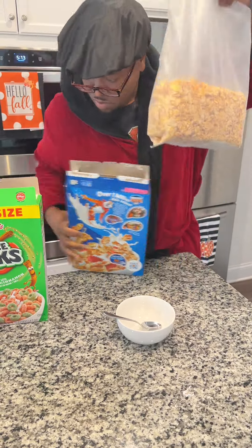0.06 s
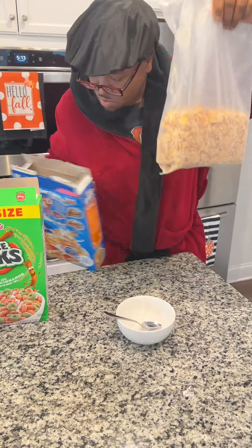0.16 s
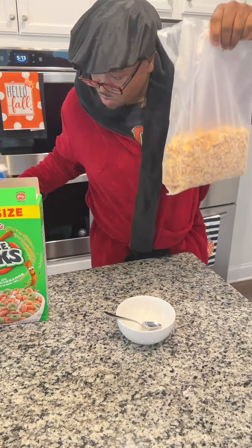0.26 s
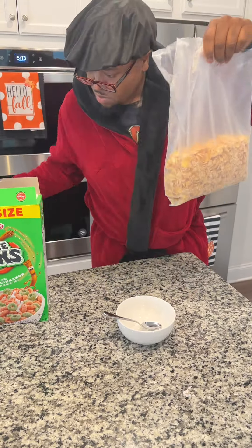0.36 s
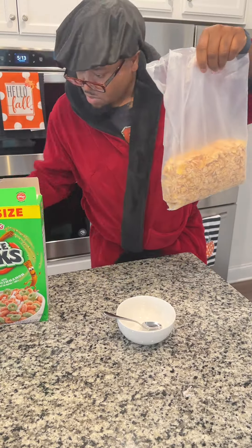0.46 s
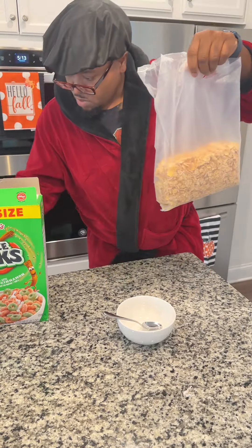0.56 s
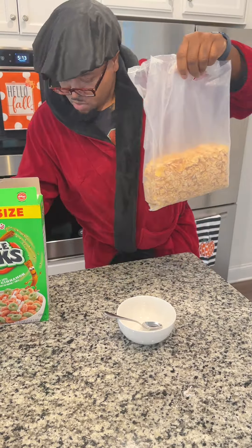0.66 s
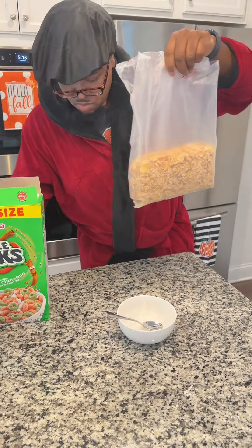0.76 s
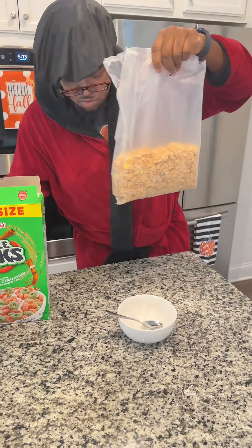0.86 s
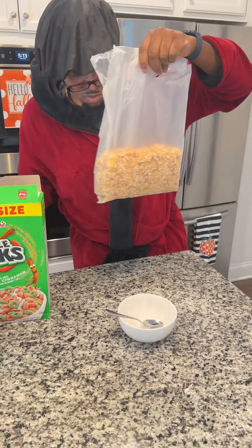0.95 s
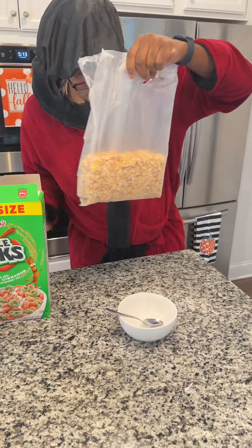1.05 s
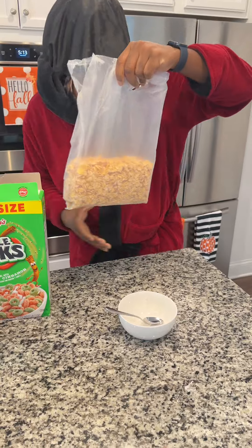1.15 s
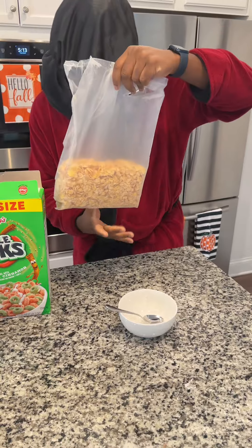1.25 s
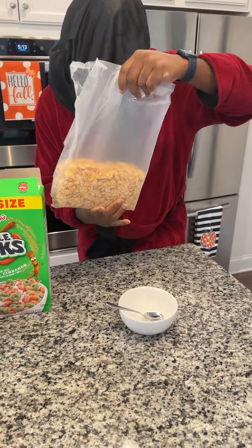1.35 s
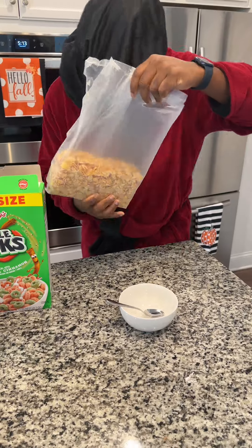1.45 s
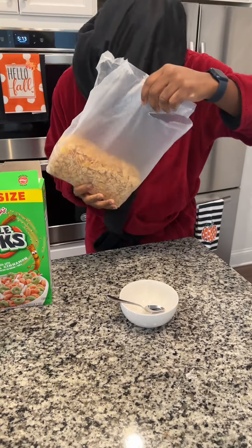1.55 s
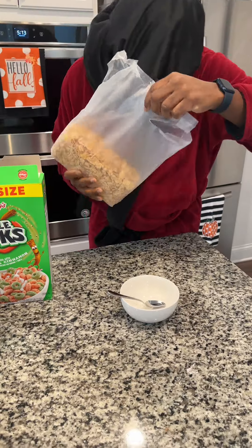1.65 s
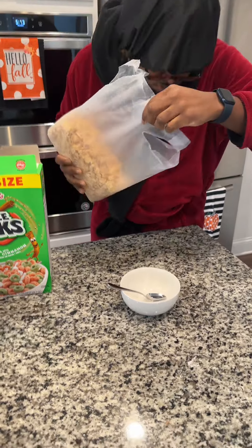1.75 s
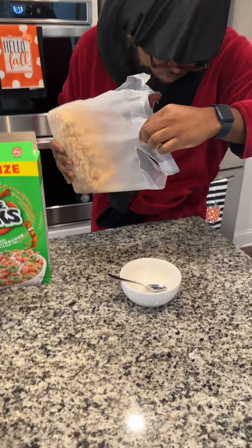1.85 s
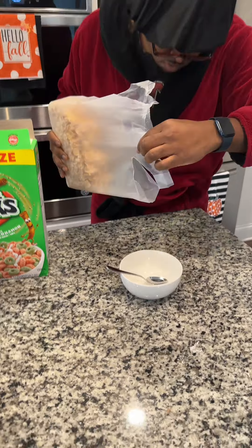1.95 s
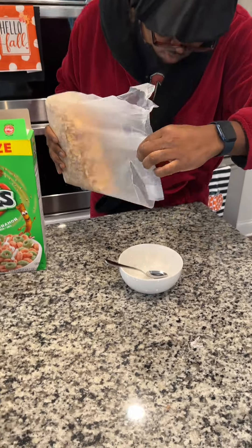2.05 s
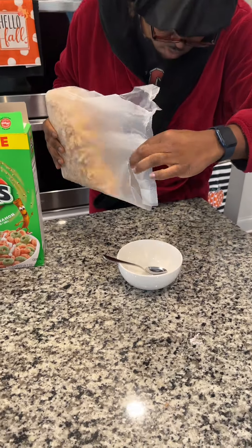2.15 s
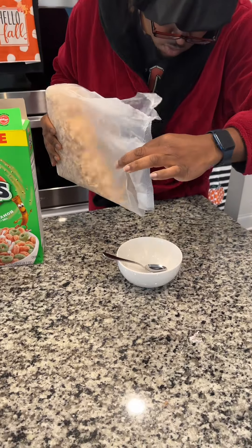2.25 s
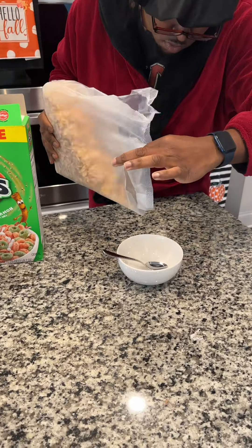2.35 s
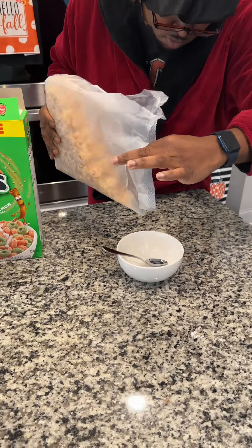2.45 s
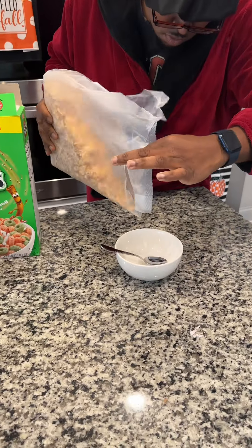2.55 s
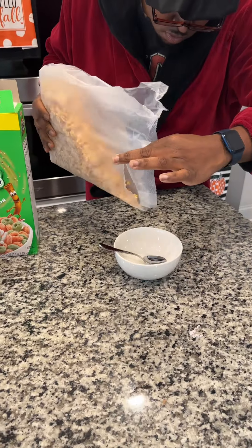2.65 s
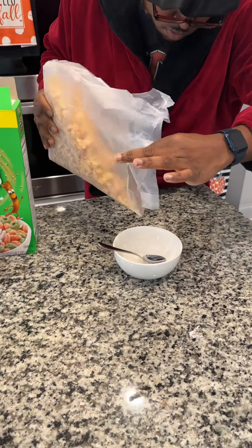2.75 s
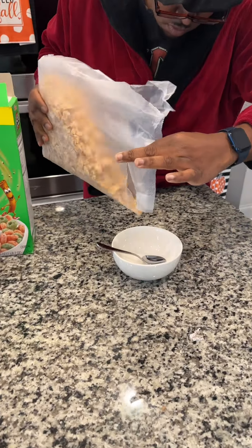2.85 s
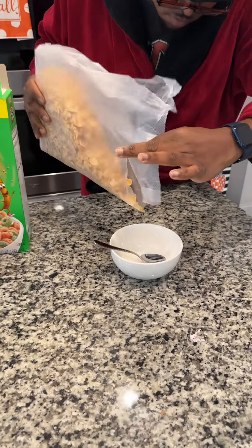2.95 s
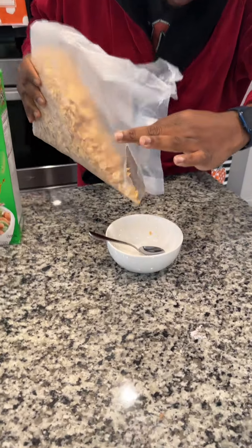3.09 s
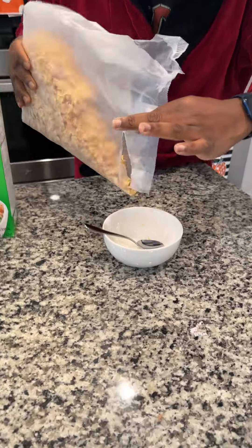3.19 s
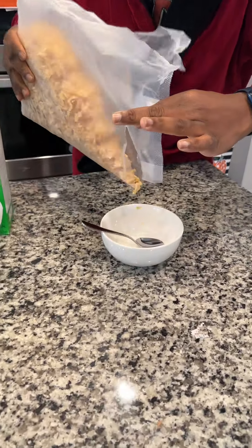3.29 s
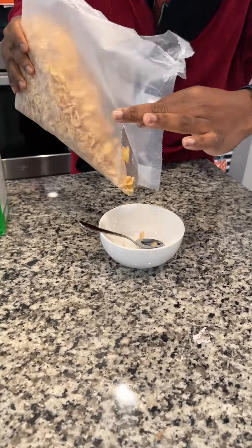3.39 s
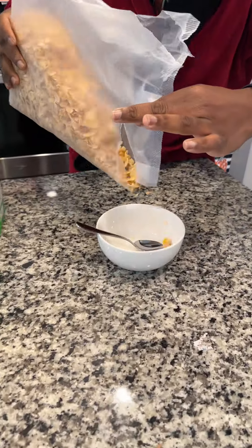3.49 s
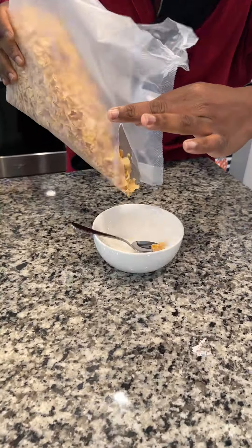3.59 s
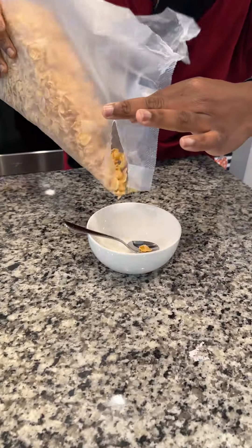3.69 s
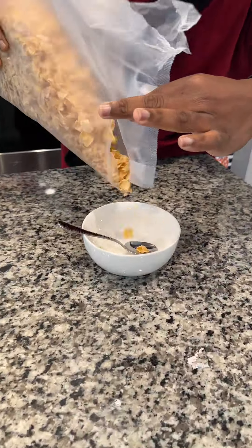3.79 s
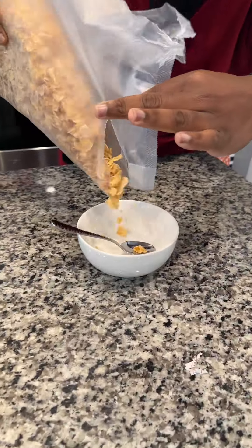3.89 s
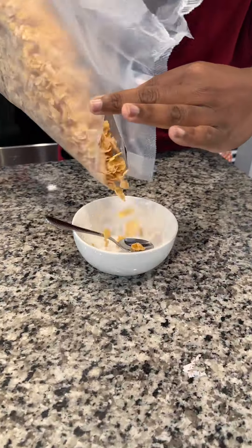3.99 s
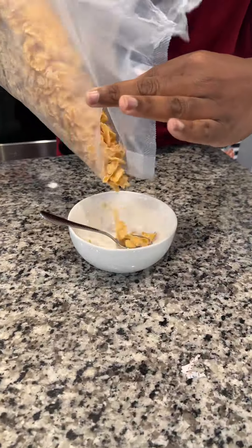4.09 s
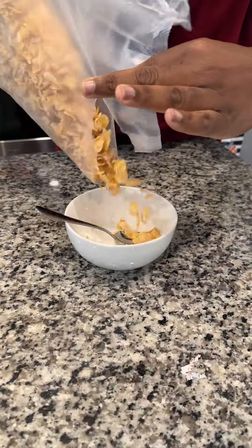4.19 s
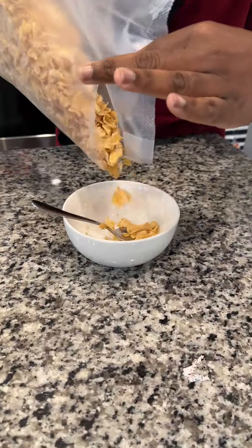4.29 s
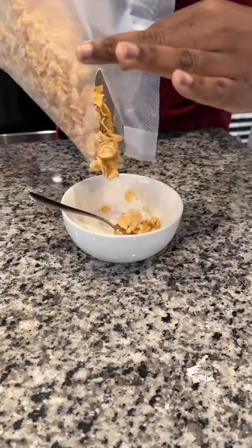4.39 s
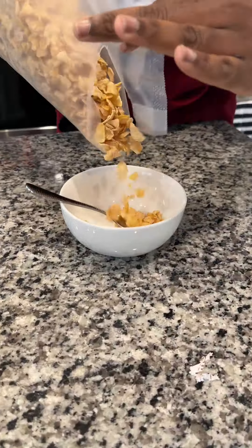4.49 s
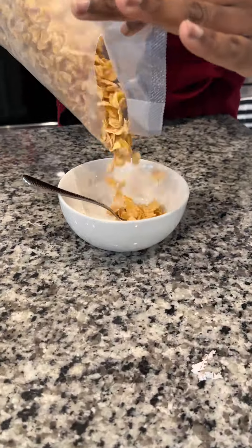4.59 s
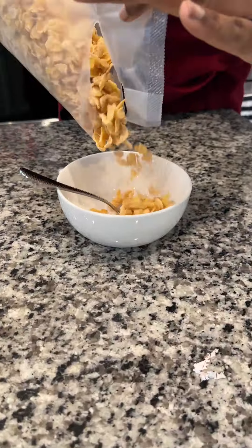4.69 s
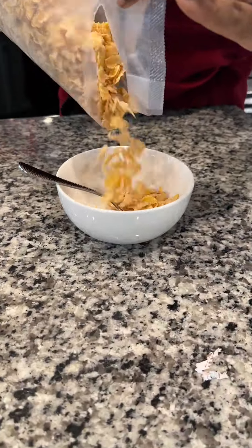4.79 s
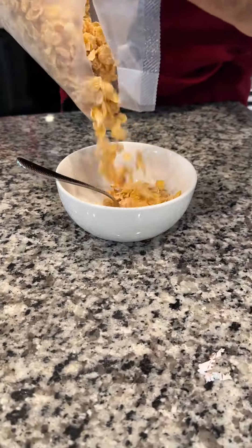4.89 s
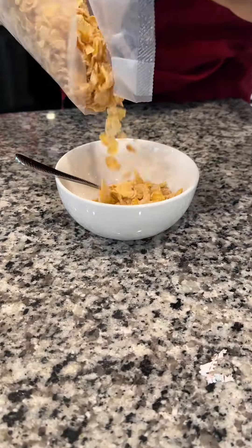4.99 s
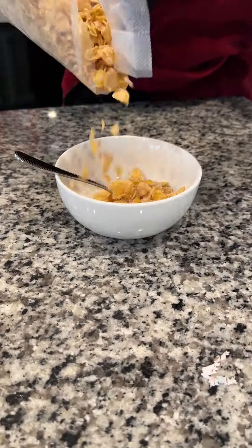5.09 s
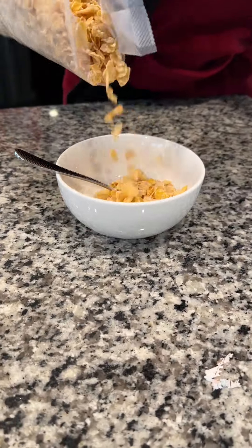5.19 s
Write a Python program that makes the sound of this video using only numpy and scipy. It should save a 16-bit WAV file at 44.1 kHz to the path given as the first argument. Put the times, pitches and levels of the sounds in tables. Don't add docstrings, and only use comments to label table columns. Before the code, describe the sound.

Papery film crinkles, then a short breathy swish of moving cardboard ends in a sharp hollow knock with small bounces on the floor. A full bag lands in a hand with a muffled thump, and its contents slide with dry hiss. Single flakes crack into a bowl, then a steady crisp trickle makes ceramic and spoon ring faintly. Phone microphones nearby, light room reflections, quiet hum beneath.

```python
import sys
import numpy as np
from scipy import signal
from scipy.fft import rfft, irfft, next_fast_len
from scipy.io import wavfile
from scipy.ndimage import uniform_filter1d

SR = 44100
rng = np.random.default_rng(int(sys.argv[2]) if len(sys.argv) > 2 else 0)


def generate_wav(signal):
    frames = np.transpose(np.atleast_2d(signal))
    scaled = np.clip(frames, -1, 1) * 32767
    pcm = np.round(scaled).astype(np.int16)
    wavfile.write(sys.argv[1], SR, pcm)


def boost(x):
    u = np.asarray(x, float) / 20
    return 10 ** u


N = 230978
SIZE = next_fast_len(N + SR)
HZ = np.maximum(np.arange(SIZE // 2 + 1) * SR / SIZE, 1)


def rms_one(x):
    return x / np.sqrt(np.mean(x ** 2) + 1e-20)


def in_time(rows):
    s, *columns = np.transpose(rows)
    return [np.interp(np.arange(N) / SR, s, c) for c in columns]


def at_hz(points, hz):
    table_hz, value = np.array(points).T
    return np.interp(np.log(hz), np.log(table_hz), value)


def drift(rate_hz):
    r = np.exp(-80 * np.pi * rate_hz / SR)
    slow = signal.lfilter([1], [1, -2 * r, r * r], rng.standard_normal(N // 40 + 2002))[2000:]
    return np.interp(np.arange(N) / 40, np.arange(len(slow)), rms_one(slow))


def ring(clicks, hz, t60_s):
    r, w = boost(-60 / (t60_s * SR)), 2 * np.pi * hz / SR
    return signal.lfilter([0, np.sin(w)], [1, -2 * r * np.cos(w), r * r], clicks + 1e-18)


def coloured(spectrum):
    noise = rfft(rng.standard_normal(SIZE))
    return rms_one(irfft(noise * boost(at_hz(spectrum, HZ)), SIZE)[:N])


def swell(s, length_s, rise_s, fall_s):
    t = np.arange(N) / SR - s
    return np.clip(t / rise_s, 0, 1) * np.exp(-np.maximum(t - length_s, 0) / fall_s)


def thump(blows, modes, damping, slap_db):
    push = np.zeros(N)
    for s, db, cut_hz in blows:
        step = 2 * np.pi * cut_hz / SR
        span = np.arange(2000) * step
        push[round(s * SR):][:2000] += boost(db) * span * np.exp(-span) * step
    body = np.zeros(N)
    for sign, (hz, db, t60_s) in zip(rng.choice([-1, 1], len(modes)), modes):
        body += sign * boost(db) * ring(push, hz, t60_s * damping)
    return body + boost(slap_db) * np.gradient(push)


# start_s, hum_db, shift_db
RUMBLE = [(0.0, -55.5, -57), (0.9, -58, -56), (2.42, -55, -45.5), (3.17, -57, -46), (4.24, -50, -46.5),
          (5.24, -57.5, -51.5)]
# pitch_hz, level_db (per Hz)
HUM = [(25, -25), (45, 1), (62, 4.5), (85, -5.5), (125, 0.5), (170, -29), (300, -50)]


def refrigerator():
    hum_db, _ = in_time(RUMBLE)
    return boost(hum_db - 0.5) * coloured(HUM)


# start_s, level_db
SWING = [(0, -72), (.2, -71), (.27, -43.5), (.32, -54), (.38, -53), (.45, -49), (.5, -57), (.56, -95)]
# pitch_hz, level_db (per Hz)
MOUTH = [(400, -47), (700, -6.5), (860, -8), (1050, -9), (1600, -35)]


def carton_swing():
    return boost(in_time(SWING)[0]) * coloured(MOUTH)


# start_s, blow_db, contact_cut_hz
CARTON_BLOWS = [
    (.572, -39, 900),
    (.5895, -26, 6100),
    (.592, -9, 1520),
    (.607, -13.5, 910),
    (.636, -26, 890),
    (.65, -26, 880),
]
# pitch_hz, level_db, t60_s
CARTON = [(101.6, -10.5, 1), (193, -7, 0.5), (212, -20, 0.22), (282, -3.5, 0.42), (428, -6, 0.57),
          (530, -16, 0.66), (684, 5.5, 0.17), (780, -23, 0.23), (855, 1.5, 0.22), (986, 4.5, 0.075),
          (1274, -10, 0.18), (1335, -9, 0.57), (1460, -23, 0.11), (1750, -7.5, 0.2)]


def carton_landing():
    return thump(CARTON_BLOWS, CARTON, damping=0.14, slap_db=23.0)


# pitch_hz, level_db (per Hz)
SHIFT = [(90, -24), (160, -5.5), (230, -4), (290, 2.5), (380, -5), (520, -41), (800, -21.5)]


def bag_shift():
    _, shift_db = in_time(RUMBLE)
    flicker_db = 1.5 * drift(16)
    return boost(shift_db + flicker_db) * coloured(SHIFT)


# start_s, blow_db, contact_cut_hz
PALM_BLOWS = [
    (1.222, -52, 910),
    (1.29, -32, 300),
    (1.312, -26, 240),
    (1.352, -32.5, 400),
    (1.385, -40, 400),
    (4.2, -51, 600),
    (5.168, -37, 296),
]
# pitch_hz, level_db, t60_s
SACK = [(59.7, 4, 0.36), (126, -1.5, 0.43), (205, -5, 0.42), (212, 4.5, 0.36), (300, 2, 0.38),
        (670, -10, 0.14)]


def palm_catch():
    return thump(PALM_BLOWS, SACK, damping=0.33, slap_db=-1.0)


# start_s, level_db, pitch_hz
CLUMPS = [(0.2157, -43, 900), (1.188, -32.5, 796), (1.219, -29.5, 616), (1.222, -33.5, 300),
          (1.457, -29, 960), (3.685, -26, 1130), (3.759, -22.5, 1050), (3.874, -29, 1210),
          (4.206, -25, 282), (4.9, -71, 1300), (5.176, -30.5, 1380)]


def clumps():
    out = np.zeros(N)
    for s, db, hz in CLUMPS:
        click = np.arange(N) == round(s * SR)
        out += ring(boost(db) * click, hz, 17.5 / hz)
    return out


# start_s, length_s, clatter_db, bowl_ring_db
SLIPS = [(0.212, 0.011, -36, -88), (0.582, 0.045, -30, -90), (1.471, 0.053, -33.5, -98),
         (1.605, 0.1, -34.5, -94), (1.971, 0.039, -35.5, -93), (2.018, 0.084, -26, -101),
         (2.653, 0.03, -29, -95), (2.722, 0.019, -38.5, -93), (2.804, 0.036, -34.5, -93),
         (2.893, 0.021, -32, -90), (3.42, 0.029, -31.5, -37.5), (3.517, 0.018, -29, -61),
         (3.63, 0.011, -40, -57), (3.798, 0.083, -31, -52), (4.023, 0.044, -25, -31),
         (4.073, 0.066, -44, -40), (4.186, 0.031, -31.5, -55), (4.257, 0.036, -31.5, -34.5),
         (4.353, 0.004, -33, -36.5), (4.529, 0.016, -33, -41), (4.58, 0.0056, -61, -37),
         (4.615, 0.023, -36, -35.5), (4.671, 0.035, -32, -35.5), (4.832, 0.019, -30, -33.5),
         (4.913, 0.026, -36.5, -35), (4.98, 0.019, -33.5, -44), (5.087, 0.014, -43, -39),
         (5.202, 0.013, -37.5, -67)]
# pitch_hz, level_db
GRAIN = [(400, -32), (600, -1), (1200, -7.5), (2500, -3.5), (4200, -7), (6000, -6.5), (9000, 0),
         (12000, -5), (15500, 6.5)]
# start_s, level_db
STIR = [(0, -46), (.18, -53.5), (.3, -47.5), (.55, -53.5), (.65, -43.5), (.9, -56), (1.24, -59.5),
        (1.38, -46), (1.79, -49), (1.94, -49), (2.14, -38), (2.54, -41.5), (3.3, -41), (3.92, -39.5),
        (4.2, -37), (4.78, -37), (5.09, -41.5), (5.24, -45.5)]
# start_s, top_db
CRISP = [(0, -4), (.8, -25), (1.0, -3.5), (1.9, -3), (2.2, 0.5), (3.9, -2), (4.3, 11), (5.24, 19.5)]


def rustle(per_s, size_db, cycles, clump_db):
    (level_db,), (top_db,) = in_time(STIR), in_time(CRISP)
    level_db = level_db - 0.48 * np.maximum(top_db, 0)
    body_db = -5 - 0.77 * (level_db - level_db.mean())
    heaps = np.zeros(N)
    for s, length_s, db, _ in SLIPS:
        shape = swell(s, length_s, rise_s=0.0011 + 0.078 * length_s, fall_s=0.017)
        heaps += (boost(db) * shape) ** 2
    level = np.sqrt(boost(level_db + 8.5) ** 2 + heaps) * boost(clump_db * drift(24.0) - 15.0)

    sizes = boost(size_db * np.minimum(rng.exponential(1, (2, N)), 2.6))
    sizes = sizes * rng.choice([-1, 1], (2, N))
    contacts = sizes * (rng.random((2, N)) < per_s / SR)
    dealt, out = rng.integers(0, 30, (2, N)), 0
    for k, hz in enumerate(np.geomspace(420, 16000, 30)):
        top = np.clip(np.log2(hz / 5000), 0, 1)
        body = np.clip(np.log2(1600 / hz) / 2.1, 0, 1)
        patchy_db = 1.82 * drift(11.8)
        tone_db = patchy_db + at_hz(GRAIN, hz) + top * top_db + body * body_db
        out = out + boost(tone_db) * rms_one(ring(contacts * (dealt == k), hz, cycles / hz))
    return signal.sosfilt(signal.cheby2(12, 40, 16500, fs=SR, output="sos"), level * out)


# pitch_hz, level_db, t60_s
BOWL = [(2830, 0, .03), (3000, 4, .03), (3170, 5, .08), (3900, -7, .05), (5555, 0, .065), (7385, -6, .06),
        (8400, -4, .07), (9990, -2, .07), (11750, -1, .05), (12400, -5, .05), (13100, -4, .06),
        (13380, -5, .06), (15685, -2, .13)]


def bowl(per_s, spread_db):
    taps = (rng.random(N) < per_s / SR) * rng.standard_normal(N)
    taps[[round((s + .002) * SR) for s, *_ in SLIPS]] = 1.9
    favour, out = rng.normal(0, 1, (len(SLIPS), len(BOWL))), np.zeros(N)
    shapes = np.array([swell(s, length_s, rise_s=0.0019, fall_s=0.0099) for s, length_s, *_ in SLIPS])
    ring_db = np.array(SLIPS)[:, -1]
    for k, (hz, level_db, t60_s) in enumerate(BOWL):
        tilt_db = 5.5 * np.log2(hz / 6000)
        gains = boost(ring_db + level_db + tilt_db + spread_db * favour[:, k] - 4.5)
        out += ring(taps * (gains @ shapes), hz, t60_s * 0.7)
    return out


def cracks(rows, cycles, crack_db, body_db, body_hz, body_s):
    out, span = np.zeros(N + 1400), np.arange(1400) / SR
    body = signal.butter(2, [700, body_hz], "band", fs=SR, output="sos")
    for (s, db, hz), (a, b) in zip(rows, rng.random((len(rows), 2))):
        crack = np.sin(2 * np.pi * hz * span) * (1 - np.exp(-span * hz)) * boost(-60 * span * hz / cycles)
        rebound = (.2 + .4 * a) * np.roll(crack, int((.0003 + .0008 * b) * SR))
        crack = min(hz / 10000, 1) * crack + rebound
        knock = signal.sosfilt(body, rng.standard_normal(1400) * boost(-60 * span / body_s))
        knock_db = body_db + 0.5 * db - 2.5 * np.log2(hz / 7000)
        out[round(s * SR):][:1400] += boost(db + crack_db) * crack + boost(knock_db) * knock
    return out[:N]


# start_s, peak_db, pitch_hz
SNAPS = [(0.0193, -17.5, 6260), (0.0733, -25, 12500), (0.0783, -19.5, 7760), (0.2155, -24, 6640),
         (0.3277, -14.5, 14600), (0.5903, -3.5, 8100), (0.6069, -4.5, 5580), (0.6858, -20.5, 3870),
         (0.844, -45, 3000), (0.8624, -26.5, 4180), (0.9923, -21, 4930), (1.015, -29, 10300),
         (1.0295, -30, 2920), (1.0753, -51, 6240), (1.1128, -25, 12200), (1.1878, -13, 5430),
         (1.1962, -20, 7400), (1.218, -13, 10700), (1.2731, -25, 4860), (1.2998, -25, 5300),
         (1.3325, -15, 4020), (1.457, -30, 2970), (1.4898, -49, 6400), (1.5125, -19, 3000),
         (1.5234, -28, 7160), (1.801, -18, 10500), (1.8345, -3.5, 10300), (2.5928, -7, 10700),
         (2.9935, -15, 9400), (3.0309, -26, 12800)]


def film_snaps():
    return cracks(SNAPS, cycles=10.3, crack_db=-0.5, body_db=-25.0, body_hz=9100, body_s=0.06)


def strays():
    a, b, c = rng.random((44, 3)).T
    start_s = 3.33 + (5.23 - 3.33) * a ** .7
    peak_db = -34 + (2 * b - 1)
    pitch_hz = 7000 + (15000 - 7000) * np.sqrt(c)
    return np.transpose([start_s, peak_db, pitch_hz])


# start_s, peak_db, pitch_hz
LANDINGS = [(3.3748, -4.5, 14600), (3.4218, -15, 3240), (3.4957, -14, 6640), (3.5912, -10, 10100),
            (3.5964, -14, 10100), (3.6511, -22, 7100), (3.8098, -16, 4060), (3.8694, -8.5, 13000),
            (3.9393, -8, 10200), (3.9513, -16, 12000), (3.959, -5, 13500), (4.0265, -23, 9800),
            (4.1003, -14, 7150), (4.1275, -8, 13500), (4.1957, -19, 10000), (4.3198, -8.5, 5830),
            (4.353, -13, 12500), (4.4842, -33, 12100), (4.5295, -29, 13400), (4.6162, -5, 10300),
            (4.6304, -11, 10900), (4.6418, -7, 7000), (4.684, -22, 10400), (4.7425, 0, 14500),
            (4.8688, -30, 11200), (4.9007, -10, 9000), (5.0624, -2, 14000), (5.0901, -14, 12700),
            (5.2039, -16, 11000), (5.2196, -11, 10400)]


def flake_landings():
    rows = [*LANDINGS, *strays()]
    return cracks(rows, cycles=6.6, crack_db=14.0, body_db=-27.5, body_hz=4660, body_s=0.0094)


# pitch_hz, t60_s
ROOM_T60 = [(60, 0.64), (600, 0.45), (4000, 0.4), (10000, 0.68), (16000, 0.082)]


def kitchen():
    t60_s, out = at_hz(ROOM_T60, HZ), 0
    for k, lag_s in enumerate(rng.uniform(.017, .083, 20)):
        loop = boost(-60 * lag_s / t60_s) * np.exp(-2j * np.pi * HZ * lag_s)
        out = out + (-1) ** k * loop / (1 - loop)
    return out


def smeared(x):
    knots_hz = np.arange(0, SR, 700)
    turns = np.interp(HZ, knots_hz, rng.random(len(knots_hz)))
    return irfft(rfft(x, SIZE) * np.exp(2j * np.pi * turns), SIZE)[:N]


def sideways(x):
    return irfft(-1j * rfft(x, SIZE), SIZE)[:N]


# pitch_hz, level_db
PORT_SIDE = [(60, -10.5), (200, -9.5), (380, -3.5), (700, 5), (1290, -7), (2000, -9.5), (2900, -3.5),
             (4200, -3), (5200, 1.5), (6100, -10.5), (8000, 2.5), (10200, 7.5), (14000, 11), (15500, 5.5)]
# pitch_hz, level_db
PORT_LEAN = [(60, -0.5), (110, 11), (200, 3.5), (380, 11), (700, 5), (1290, 1), (2380, 1), (4400, 0.0),
             (8120, 0.5), (15000, 0.5)]


def ports(direct, other, rooms, wet_db):
    mid = rfft(direct, SIZE) * (1 + boost(wet_db) * rooms[0])
    other = rfft(other, SIZE) * (1 + boost(wet_db) * rooms[1])
    k = boost(at_hz(PORT_SIDE, HZ))
    balance = np.tanh(at_hz(PORT_LEAN, HZ) * np.log(10) / 20)
    lean = np.clip((1 + k * k) / (2 * k) * balance, -.98, .98)
    side = k * (lean * mid + np.sqrt(1 - lean ** 2) * other)
    return irfft(np.array([mid + side, mid - side]) / np.sqrt(1 + k * k), SIZE)[:, :N]


def scene():
    rooms = kitchen(), kitchen()
    far = refrigerator() + carton_swing() + carton_landing()
    far = ports(far, smeared(far), rooms, wet_db=-15.0)
    flakes = rustle(per_s=13000, size_db=4.2, cycles=7.0, clump_db=.8)
    solid = bag_shift() + palm_catch() + bowl(per_s=700, spread_db=2.0)
    near = ports(flakes[0] + solid, flakes[1] + smeared(solid), rooms, wet_db=-19.0)
    sharp = clumps() + film_snaps() + flake_landings()
    return far + near + ports(sharp, sideways(sharp), rooms, wet_db=-18.5)


# pitch_hz, level_db
TOP_DROP = [(15850, 0), (15950, -90)]
# from_hz, to_hz, chance (0-1)
SUM_KEEP = [(9700, 10300, .7), (10300, 10900, .2), (10900, 13600, 0), (13600, 14300, .2),
            (14300, 15000, .6), (15000, 15900, .9)]
# from_s, to_s
KEPT = [(0.014, 0.025), (0.069, 0.081), (0.324, 0.333), (0.586, 0.618), (0.985, 1.038), (1.074, 1.154),
        (1.17, 1.228), (1.267, 1.314), (1.514, 1.546), (3.37, 3.424), (3.489, 3.538), (3.588, 3.601),
        (3.791, 3.823), (3.866, 3.874), (3.89, 3.915), (3.947, 3.986), (3.999, 4.026), (4.191, 4.199),
        (4.474, 4.492), (4.868, 4.908), (5.208, 5.238)]


def thinned(x):
    both = rfft(np.array([x[0] + x[1], x[0] - x[1]]) / 2, SIZE) * boost(at_hz(TOP_DROP, HZ))
    mid, side = irfft(both, SIZE)[:, :N]
    luck = rng.random(N // 1024 + 1)
    for low_hz, high_hz, chance in SUM_KEEP:
        draw = (luck + rng.random(len(luck))) / 2
        lost = draw > .5 + np.arcsin(2 * chance - 1) / np.pi
        lost = uniform_filter1d(np.repeat(1. * lost, 1024)[:N], size=300)
        mid = mid - lost * irfft(both[0] * (HZ >= low_hz) * (HZ < high_hz), SIZE)[:N]
    t = np.arange(N) / SR
    kept = uniform_filter1d(sum(1. * (t > a) * (t < b) for a, b in KEPT), size=200)
    return kept * x + (1 - kept) * np.array([mid + side, mid - side])


def roll_off(x):
    return signal.sosfilt(signal.butter(12, 17140, fs=SR, output="sos"), x)


def record(dry):
    low_cut = signal.butter(4, 56, "high", fs=SR, output="sos")
    high_cut = signal.cheby2(12, 60, 17100, fs=SR, output="sos")
    mix = thinned(signal.sosfilt(np.vstack([low_cut, high_cut]), dry))
    return roll_off(mix)


dry = scene()
out = record(dry)
generate_wav(out)
```